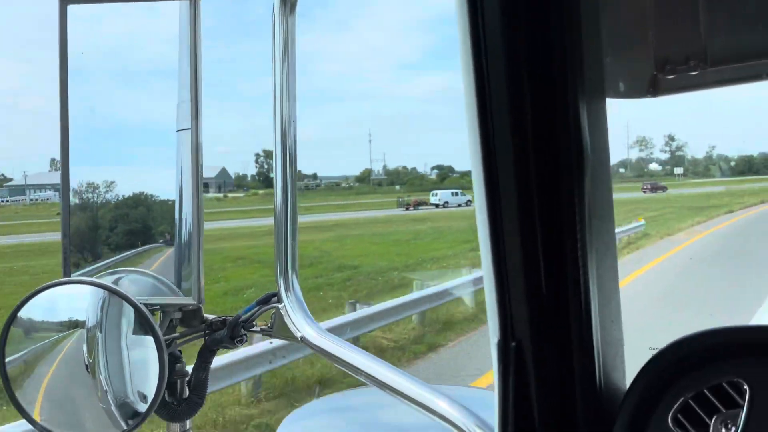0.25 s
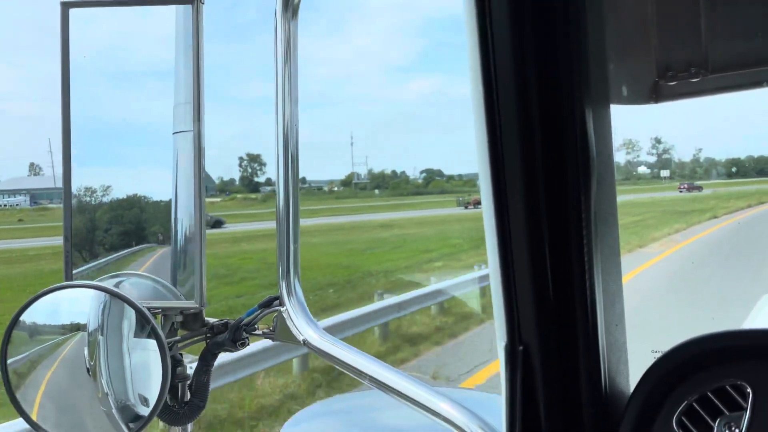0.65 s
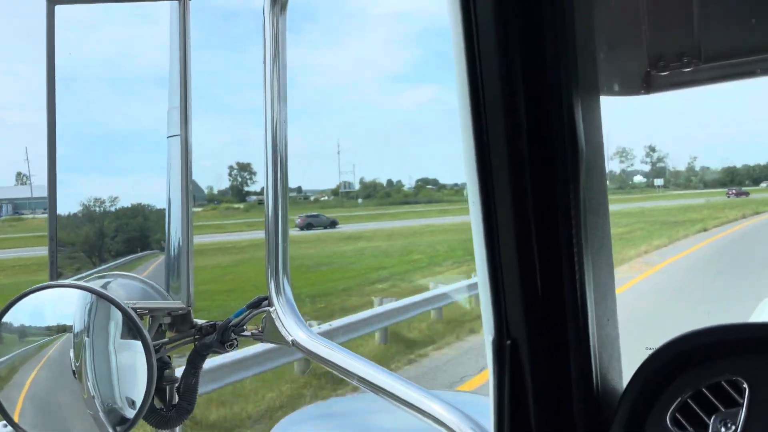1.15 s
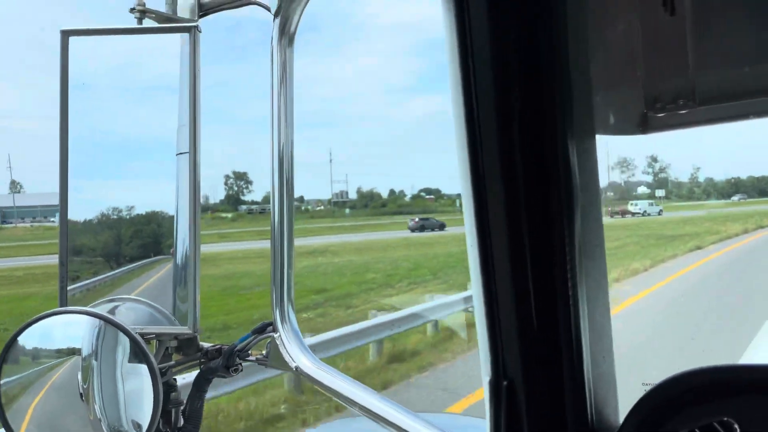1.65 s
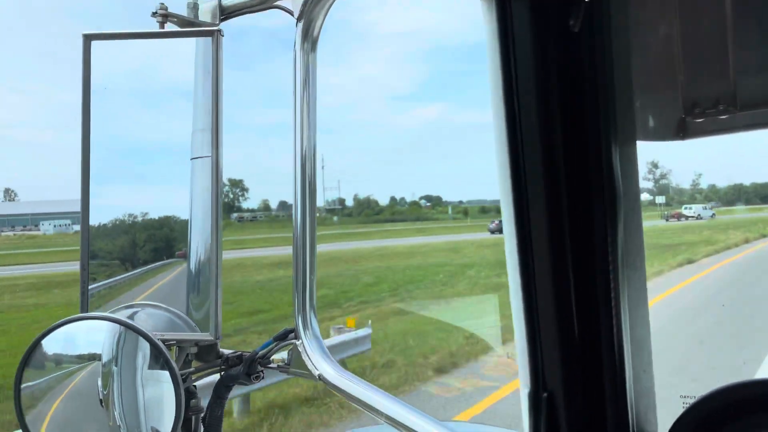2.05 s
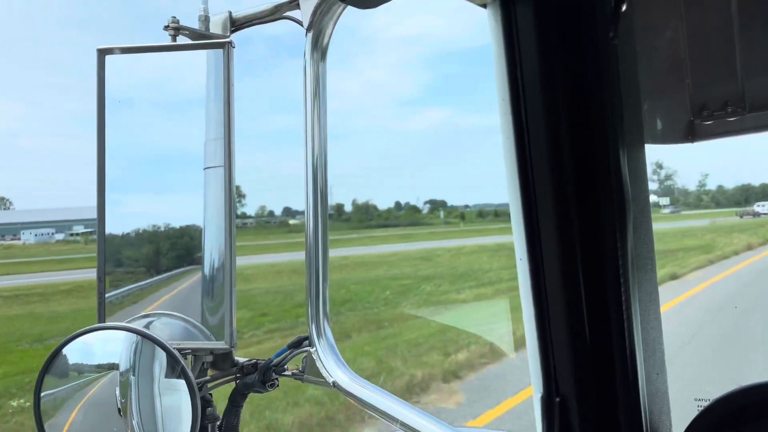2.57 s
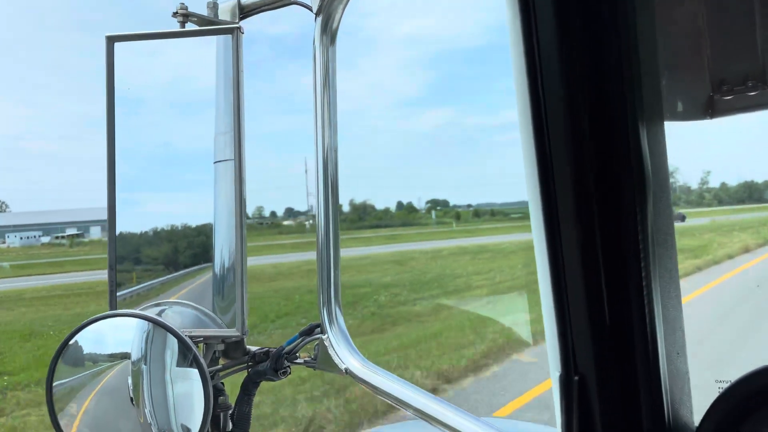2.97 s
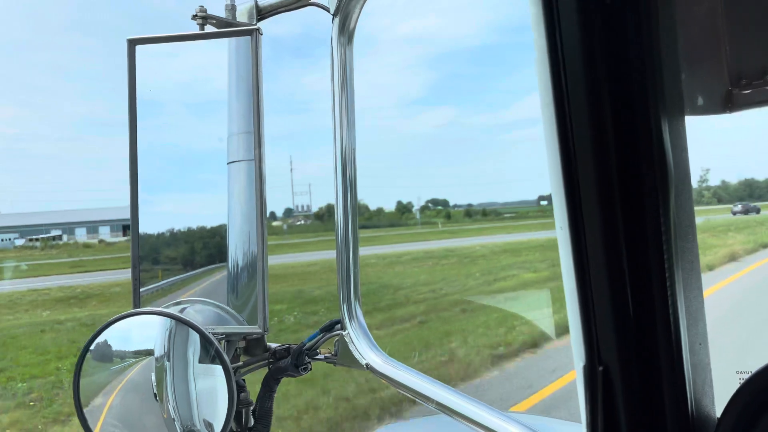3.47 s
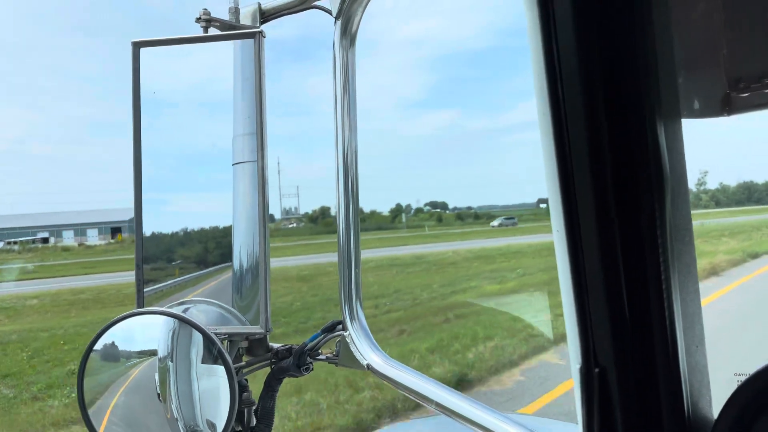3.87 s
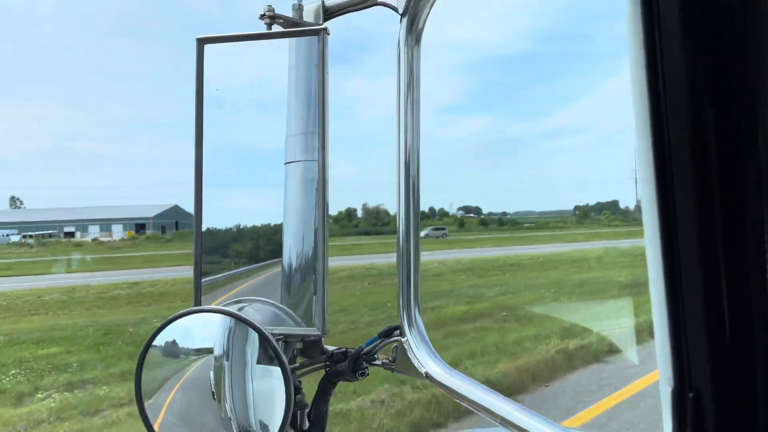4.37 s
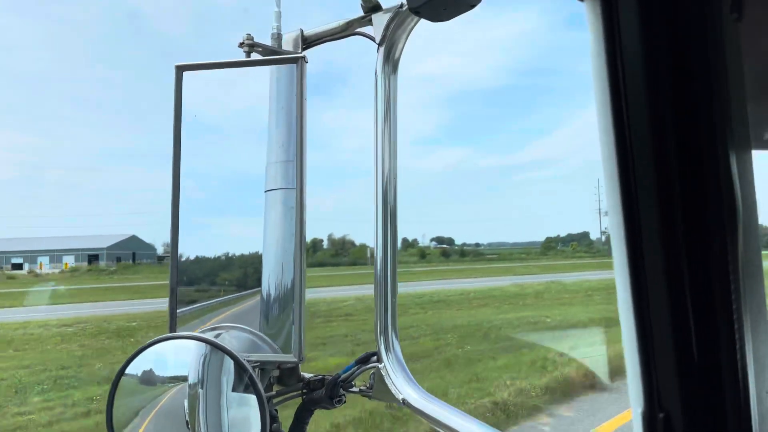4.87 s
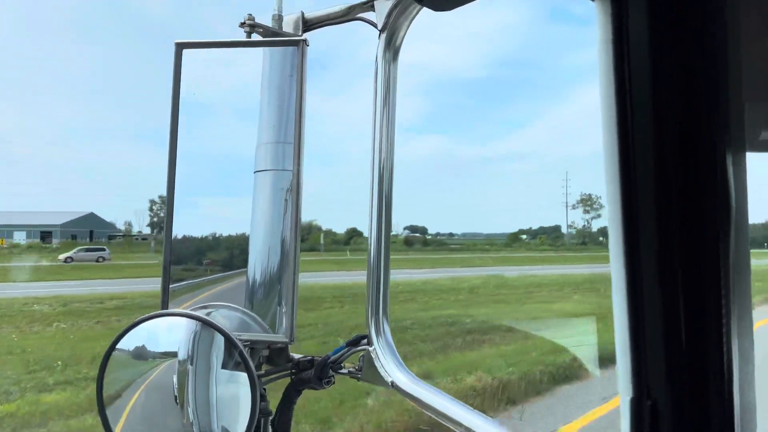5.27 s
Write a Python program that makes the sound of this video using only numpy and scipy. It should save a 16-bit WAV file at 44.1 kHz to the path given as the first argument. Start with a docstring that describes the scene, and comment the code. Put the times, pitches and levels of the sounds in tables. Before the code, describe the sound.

A heavy diesel drones upward and falls, revving briefly twice before a deep labouring pull, with wind thumps, air puffs and faint turbo whistle.

```python
"""A six-cylinder diesel truck pulls hard, lifts off, blips twice through a gear change and lugs away again,
heard in the cab by an open side window. The engine is a harmonic series on the firing rate plus weaker lines
between, lifted by cab booms. Clatter is filtered noise that rings panels and block. Wind on the microphone is
coloured noise with short damped pushes. Hiss, puffs of valve air and a gliding turbo whistle come from outside."""
import sys
import numpy as np
from scipy import signal
from scipy.fft import rfft, irfft, next_fast_len
from scipy.io import wavfile
from scipy.ndimage import uniform_filter1d

SR = 44100
rng = np.random.default_rng(int(sys.argv[2]) if len(sys.argv) > 2 else 0)


def master(y):
    """Save y as 16-bit WAV."""
    cut = np.clip(np.atleast_2d(y).T, -1, 1)
    pcm = np.round(cut * 32767)  # scale
    wavfile.write(sys.argv[1], SR, pcm.astype(np.int16))


N = 243431
TIME_S = np.arange(N) / SR


def undb(db):
    """Logarithmic level: amplitude gain is 10 ** (dB / 20)."""
    return 10 ** (np.asarray(db) / 20)


def curves(table):
    """Linear interpolation: each column of a time table, one value per sample."""
    s, *columns = np.transpose(table)
    return [np.interp(TIME_S, s, column) for column in columns]


def at(x, table):
    """Linear interpolation: look x up in a table of two columns."""
    return np.interp(x, *np.transpose(table))


def follow(load, span_db):
    """Load dependence: level between coasting and full load."""
    return span_db[0] + np.clip(load, 0, 1) * (span_db[1] - span_db[0])


def walk(rate):
    """Slow random modulation: levels held 1 / rate s and slewed twice; spread near 1."""
    k = int(SR / rate)
    steps = np.repeat(rng.standard_normal(N // k + 1), k)
    return 1.3 * uniform_filter1d(uniform_filter1d(steps, k), k)[:N]


def band(x, edge_hz, kind):
    """Band splitting: third-order Butterworth filter."""
    return signal.sosfilt(signal.butter(3, edge_hz, kind, fs=SR, output="sos"), x)


def colour(x, shape):
    """Spectral shaping: filter by (frequency_hz, level_db) points and bring to rms 1."""
    hz, db = np.transpose(shape)
    size = next_fast_len(N)
    grid = np.log(np.maximum(np.arange(size // 2 + 1) * SR / size, 1))
    gain = undb(np.interp(grid, np.log(hz), db, left=-90, right=-90))
    y = irfft(rfft(x, size) * gain, size)[..., :N]
    return y / np.sqrt(np.mean(y ** 2))


def ring(x, modes, even=True):
    """Modal resonance: sum of peaks; even filters each twice and brings it to rms 1 before its gain."""
    out = 0
    for hz, width_hz, db in modes:
        b, a = signal.iirpeak(hz, hz / width_hz, SR)
        part = signal.lfilter(b, a, x)
        if even:
            part = signal.lfilter(b, a, part)
            part = part / part.std()
        out = out + undb(db) * part
    return out


# Likeness of noise at the two ports: frequency_hz, correlation (0-1)
PORT_LIKENESS = [(30, 0.55), (170, 0.79), (260, 0.65), (500, 0.53), (900, 0.35), (1300, 0.48), (2000, 0.91),
                 (2800, 0.41), (4200, 0.091), (5300, 0.6), (6200, 0.81), (7800, 0.83), (8800, 1),
                 (11000, 0.97), (13000, 0.73)]
# Phase by which the left port leads: frequency_hz, lead_rad
LEFT_LEAD = [(200, 0), (300, -1.2), (450, 0), (690, 1.3), (1380, 0), (2330, .2), (3880, .6), (4600, 3),
             (5770, 6.1), (6720, 7), (8300, 9.42), (9600, 9.42), (10200, 10), (11800, 12.4), (13700, 12.5)]


def ports(envelope):
    """Partial coherence: noise under one envelope, part shared by the left and right port."""
    size = next_fast_len(N)
    hz = np.maximum(np.arange(size // 2 + 1) * SR / size, 1)
    left, other = rfft(envelope * rng.standard_normal((2, N)), size)
    alike_hz, correlation = np.transpose(PORT_LIKENESS)
    alike = np.clip(np.interp(np.log(hz), np.log(alike_hz), correlation), 0, 1)
    late = np.exp(-1j * at(hz, LEFT_LEAD))
    right = alike * late * left + np.sqrt(1 - alike ** 2) * other
    return irfft(np.array([left, right]), size)[:, :N]


# Spectrum of the flutter, also of the rough edge on each push: frequency_hz, level_db (per Hz)
FLUTTER_SHAPE = [(120, -14), (200, -3), (509, -7), (563, -10.5), (626, -15), (707, -14), (1100, -26.5),
                 (1430, -52.5), (2420, -120)]
THUMP_OVERTONE_DB, THUMP_NOISE_DB = -19.5, -12.5  # overtone and rough edge against the main tone


def thuds(table, t60_s, skew_rad):
    """Damped oscillation: a brief push for each row, its main tone out of step by skew_rad at the ports."""
    out, t = np.zeros((2, N + SR)), np.arange(SR // 20) / SR
    edge = colour(rng.standard_normal((2, N)), FLUTTER_SHAPE)[:, :len(t)]
    envelope = (1 - np.exp(-t / 0.0038)) ** 2 * np.exp(-np.log(1000) * t / t60_s)
    for (s, db, hz), (pan, skew) in zip(table, rng.standard_normal((len(table), 2))):
        start = int(s * SR)
        turn = 2 * np.pi * hz * t + skew_rad * np.sign(skew) * np.array([[.5], [-.5]])
        tone = np.sin(turn) + undb(THUMP_OVERTONE_DB) * np.sin(2.415 * turn)
        push = (tone + undb(THUMP_NOISE_DB) * np.roll(edge, start)) * envelope
        port_db = db + 1.7 * pan * np.array([[1], [-1]])
        out[:, start:][:, :len(t)] += undb(port_db) * push / np.abs(push).max()
    return out[:, :N]


# Small eddies between the loud ones: time_s, mean_peak_db
SWARM_LEVEL = [(0, -33), (.5, -38), (1, -34), (1.8, -30), (2.1, -27), (2.7, -26.5), (3.2, -23.5),
               (3.7, -22), (3.9, -32), (4.2, -14), (4.35, -17.5), (4.7, -14), (5, -16), (5.3, -18.5),
               (5.52, -17)]
SWARM_PER_S, SWARM_SPREAD_DB = 110, 3
SWARM_HZ, SWARM_OCTAVES = 219.6, 0.697  # median pitch and its spread


def swarm():
    """Turbulence as random arrivals: rows of start_s, peak_db, pitch_hz."""
    count = int(SWARM_PER_S * N / SR)
    s = rng.random(count) * (N - 1) / SR
    size, pitch = rng.standard_normal((2, count))
    db = at(s, SWARM_LEVEL) + SWARM_SPREAD_DB * np.clip(size, -2, 2)
    return np.transpose([s, db, SWARM_HZ * 2 ** (SWARM_OCTAVES * np.clip(pitch, -2, 2))])


# Spectrum of the wind rumble: frequency_hz, level_db (per Hz)
RUMBLE_SHAPE = [(12, -36), (25, -18.5), (43, 0), (61, 0.5), (80, -4), (114, 3), (155, -1), (260, -14),
                (340, -27)]
# Brief drops of the wind: centre_s, half_length_s, change_db
WIND_LULLS = [(0.396, 0.04, -6), (1.273, 0.011, -5), (2.563, 0.029, -6), (2.748, 0.039, -7.5),
              (3.27, 0.02, -3), (4.182, 0.012, -2.5)]
# Gusts that thump the microphone: start_s, peak_db (before a random pan), pitch_hz
GUST_THUMPS = [(1.39, -10, 261), (1.56, -11.5, 250), (1.779, -12, 250), (1.938, -3, 198),
               (2.077, -5.5, 300), (2.204, -10, 365.2), (2.398, -6.5, 257.2), (2.473, -16, 406),
               (2.904, -12, 321.6), (3.132, -26, 550), (3.299, -10.5, 206), (3.638, -10, 215.5),
               (3.867, -2, 233.5), (3.91, -14.5, 255.8), (3.948, -23, 587), (4.359, -14.5, 355),
               (4.534, -13, 316.4), (4.621, -18, 451.4), (4.664, -17.5, 605), (4.749, -29, 410),
               (4.945, -30, 453), (5.017, -22, 500.3), (5.312, -17, 546.5)]
# Eddies that push one port and pull the other: start_s, peak_db (before a random pan), pitch_hz
CROSS_EDDIES = [(1.160, -15, 330), (1.646, -16, 247), (2.094, -7, 350), (2.156, -19, 330),
                (2.235, -16, 220), (2.443, -22, 302), (2.550, -15, 318), (2.631, -16, 250),
                (2.750, -22, 300), (2.859, -14, 250), (2.968, -16, 350.5), (3.072, -20, 280),
                (3.138, -13, 250), (3.279, -10, 248.2), (3.343, -17, 379.9), (3.413, -17, 181.2),
                (3.479, -17, 260), (3.566, -19, 330), (3.647, -19, 219.9), (3.681, -12, 260),
                (3.972, -25, 414), (4.082, -15, 261.7), (4.140, -12, 300), (4.294, -12, 302),
                (4.345, -14, 198), (4.401, -15, 500), (4.490, -9, 292), (4.570, -8, 303.2),
                (4.622, -10, 413), (4.686, -12, 400.2), (4.773, -16, 296.9), (4.822, -16, 481),
                (4.867, -15, 398), (4.915, -14, 296), (4.943, -8.5, 304), (5.012, -12, 149.2),
                (5.057, -13, 510), (5.167, -11, 300.4), (5.244, -13, 300), (5.356, -11, 420),
                (5.405, -7, 178.5), (5.43, -14, 395), (5.494, -17, 301)]
THUMP_T60_S, EDDY_T60_S = 0.028, 0.024
THUMP_SKEW_RAD, EDDY_SKEW_RAD, SWARM_SKEW_RAD = 0.43, 2.93, 2.93  # phase between the ports


def wind(rumble_db, flutter_db):
    """Turbulent pressure: lumpy rumble, with faster, shallower flutter above it, thumps and cross eddies."""
    rumble = colour(ports(undb(3.1 * walk(22.164))), RUMBLE_SHAPE)
    rumble = rumble / band(rumble, (110, 135), "band").std()  # rumble_db is the level in this band
    flutter = colour(ports(undb(2.0 * walk(45))), FLUTTER_SHAPE)
    lull_db = sum(db * np.exp(-((TIME_S - s) / half_s) ** 2) for s, half_s, db in WIND_LULLS)
    pushes = thuds(GUST_THUMPS, THUMP_T60_S, THUMP_SKEW_RAD)
    pushes = pushes + thuds(CROSS_EDDIES, EDDY_T60_S, EDDY_SKEW_RAD)
    pushes = pushes + thuds(swarm(), EDDY_T60_S, SWARM_SKEW_RAD)
    return undb(lull_db) * (undb(rumble_db) * rumble + undb(flutter_db) * flutter) + pushes


# Airy swells in the low treble: start_s, end_s, level_db
SWELL_TIMES = [(1.4, 1.744, -37), (2.315, 2.726, -37)]
# Resonances of the swells: frequency_hz, width_hz (of each pass), level_db
SWELL_MODES = [(1210, 210, -1.5), (2350, 1190, 1.5), (2920, 1000, -24)]


def swells():
    """Amplitude-modulated band noise: rushes of air that rise, hold and fade."""
    shape = 0
    for start, end, db in SWELL_TIMES:
        phase = np.clip((TIME_S - start) / (end - start), 0, 1)
        shape = shape + undb(db) * np.sin(np.pi * phase) ** 0.59
    return shape * ring(ports(undb(1.5 * walk(30))), SWELL_MODES)


# Spectrum of the steady hiss: frequency_hz, level_db (per Hz)
HISS_SHAPE = [(3000, -2), (3900, 6.5), (5500, -2), (7000, -2), (8500, -3.5), (9500, -12), (10200, -2),
              (11200, -0.5), (12200, -14.5), (12500, -35)]


def hiss(level_db):
    """Broadband flow noise: a steady hiss of air outside."""
    return undb(level_db) * colour(ports(undb(0.51 * walk(9.0))), HISS_SHAPE)


# Spectrum of the puffs: frequency_hz, level_db (per Hz)
PUFF_SHAPE = [(1200, -4), (2000, -2), (2700, 3), (3800, -2), (5200, -7), (7500, 1), (8400, -2),
              (9500, -5.5), (10800, 1.5), (12300, -13.5), (13000, -21), (14800, -48)]
# Whistling of the valve: frequency_hz, width_hz (of each pass), level_db
NOZZLE_MODES = [(2700, 2400, -15.5), (5460, 2000, -39), (10600, 90, -21)]
# Valve housing, rung as each puff opens: frequency_hz, width_hz, gain_db
HOUSING_MODES = [(2120, 70, 10), (2525, 50, 19), (3235, 50, 13), (3924, 60, 12), (4597, 50, 8),
                 (5351, 60, 8)]
# Puffs of air from a valve: start_s, level_db, rise_s, t60_s, share_5500_to_9000_hz_db,
# share_above_9000_hz_db, whistle_hz, whistle_db (before a common -8 dB)
PUFF_EVENTS = [(.004, -24.5, 0.0023, 0.17, 10, 12, 4350, 7), (0.331, -12, 0.0025, 0.13, -2, 11, 2540, -9),
               (0.43, -37.5, 0.0035, 0.19, 4.5, 2, 3800, 3), (0.685, -29, 0.0021, 0.15, 4.5, -3, 3840, -6),
               (0.832, -35, 0.0079, 0.77, 1.5, -3, 2234, 1),
               (1.013, -28.5, .003, 0.057, -22, -22, 4600, -14),
               (1.213, -31.5, 0.0048, 0.13, -14, -4, 3200, -16),
               (1.371, -41.5, .003, 0.11, -2, 11, 11500, 4), (1.47, -29.5, 0.0049, 0.56, 6, 3.5, 2650, -3),
               (2.269, -34.5, 0.0029, 0.13, 8.5, 5, 4570, 5), (2.308, -40, 0.0025, 0.17, 8, 6, 7300, -1),
               (2.48, -44, 0.0027, 0.38, 4.5, 2.5, 7500, -10), (2.59, -47, 0.0027, 0.15, 4, 10, 7400, 0),
               (3.356, -28.5, 0.0093, 0.14, 2.5, -3, 7000, -15),
               (3.716, -41.5, 0.0018, 0.087, 0, 9.5, 11400, 1),
               (3.809, -36, .003, 0.12, -11, -14, 2025, -1), (4.519, -28.5, 0.004, 0.23, -16, -9, 3900, 2)]
WHISTLE_Q, KNOCK_T60_S = 6, .04


def puffs():
    """Jet noise with exponential decay: each puff hisses and whistles, and its opening rings the housing."""
    jet = ports(undb(2.2 * walk(120)))
    gas = colour(jet, PUFF_SHAPE) + ring(jet, NOZZLE_MODES)
    body, middle, top = band(gas, 5500, "low"), band(gas, (5500, 9000), "band"), band(gas, 9000, "high")
    out, knocks = 0, 0
    for s, db, rise_s, t60_s, middle_db, top_db, hz, whistle_db in PUFF_EVENTS:
        age = np.maximum(TIME_S - s, 0)
        opening = undb(db) * (1 - np.exp(-age / rise_s))
        knocks = knocks + opening * np.exp(-np.log(1000) * age / KNOCK_T60_S)
        whistle = undb(-8.0) * ring(jet, [(hz, hz / WHISTLE_Q, whistle_db)])
        air = body + undb(middle_db) * middle + undb(top_db) * top + whistle
        out = out + opening * np.exp(-np.log(1000) * age / t60_s) * air
    return out + ring(knocks * jet, HOUSING_MODES, even=False)


# Turbo, spooling up under load and running down after the lift: time_s, pitch_hz
TURBO_PITCH = [(0, 4950), (.5, 5350), (.7, 5500), (.82, 5250), (.93, 4960), (1.05, 4760), (1.2, 4510),
               (1.35, 4220), (1.72, 3770), (2, 3650), (3.2, 3500), (3.6, 3200), (5.52, 3400)]
# Mean level of the turbo whistle by its pitch: pitch_hz, level_db
TURBO_LEVEL_BY_PITCH = [(3250, -72), (3550, -64), (3750, -58), (4000, -64), (4400, -63), (4800, -61),
                        (4950, -59), (5050, -65), (5250, -62), (5480, -64)]
WINDOW_LAG_S = 0.0002  # the whistle comes in by the window and reaches the left port first


def turbo():
    """Phase integration: a wavering gliding tone, its level set by its pitch."""
    hz, = curves(TURBO_PITCH)
    level_db = at(hz, TURBO_LEVEL_BY_PITCH) + 3.0 * walk(40)
    turns = np.cumsum(hz * (1 + 0.006 * walk(150))) / SR
    turns = turns - hz * WINDOW_LAG_S * np.array([[0], [1]])
    return np.sqrt(2) * undb(level_db) * np.sin(2 * np.pi * turns)


# Spectrum of the clatter: frequency_hz, level_db (per Hz)
CLATTER_SHAPE = [(470, -41), (800, 0), (1030, -7.5), (1180, -9.5), (1540, -13.5), (1830, -14),
                 (2150, -11.5), (2340, -15.5), (2590, -16), (3080, -18.5), (5000, -44.5), (6500, -46),
                 (11000, -120)]
# Panels rung by the clatter: frequency_hz, width_hz (of each pass), level_db
PANEL_MODES = [(338.8, 53, -3.5), (626, 55, -4), (796, 22, -17), (1160, 190, -19), (2580, 1200, -21.5),
               (3390, 83, -25)]
# Block rung by hard combustion: frequency_hz, width_hz (of each pass), level_db
BLOCK_MODES = [(1380, 200, -23), (2150, 400, -24), (3900, 500, -30), (4450, 600, -27), (6000, 600, -31)]


def clatter(turns, level_db, load_db):
    """Impact-driven resonance: valve gear rattles bulkhead and panels; under load the firings ring the block."""
    beat = 6.0 + np.exp(-(turns % 1) / 1.1)  # a small lift at each firing
    rattle = ports(beat * undb(1.6 * walk(18) + 0.56 * walk(60)))
    rattling = colour(rattle, CLATTER_SHAPE) + ring(rattle, PANEL_MODES)
    return undb(level_db) * rattling + undb(load_db) * ring(ports(beat), BLOCK_MODES)


# Higher lines: multiple of the firing rate
UPPER_MULTIPLES = (3, 4, 5, 6, 7, 8, 10)
# Their levels, on top of the load and the exhaust path: level_db
UPPER_LEVELS = (-1, -8, -16, -15, -18.5, -26, -20)
# Lines between, from cylinders that differ: multiple of the full cycle of six firings
BETWEEN_MULTIPLES = (3, 5, 7, 9, 10, 14, 20, 21, 27, 29, 33, 39)
# Their levels, on top of the unevenness: level_db
BETWEEN_LEVELS = (-7.5, -3.5, 1, -1, 0.5, -10, -13.5, -16, -15.5, -16, -19.5, -26.5)
# Level of the second multiple on top of the load: time_s, change_db
SECOND_LEVEL_SWING = [(0, 4.5), (.9, 2.5), (1.05, 1.5), (1.22, 5), (1.35, -2.5), (1.9, 3.5), (2.12, 3),
                      (2.3, -3), (2.47, 7), (2.6, -1), (2.72, 7.5), (2.8, -4.5), (2.97, 3.5), (3.15, 5),
                      (3.6, 1.5), (3.9, -5.5), (4.3, -2.5), (5.52, -0.5)]
# Way from the exhaust into the cab: frequency_hz, gain_db
EXHAUST_PATH = [(45, 6), (53, 4), (66, -1), (74, 0), (88, -8.5), (92, -20.5), (94, -3), (98, 2), (103, 5.5),
                (105.3, -6), (107.2, 7.5), (113, 1), (122, 1.5), (146, 6.5), (156, 0), (163, 7.5),
                (187, -10), (193, -2.5), (202, -5), (214, -4.5), (225, -8.5), (250, -5), (270, 5),
                (290, -6), (322, 6), (345, 5), (375, 0.5), (415, -1), (470, -1)]
# Cab booms added to the engine lines: frequency_hz, width_hz, gain_db
CAB_BOOM_MODES = [(97.17, 1.15, 8.5), (150.7, 10.4, -3), (513, 16, 4.5)]
BOOM_DB, SECOND_DB, UPPERS_DB = (-30, -12.5), (-29, -18.5), (-42, -21)  # (coasting, full load)
GEAR_TEETH = 74 / 6  # mesh whine as a multiple of the firing rate
GEAR_DB, GEAR_OUT_S, GEAR_FADE_DB_PER_S = -48, .76, 200  # whines only until the low gear is let go
UPPER_WAVER_DB = 1.5  # extra waver above the third multiple


def engine(hz, load, uneven_db):
    """Harmonic series: wavering multiples of the firing rate and lines between, lifted by cab booms."""
    turns = np.cumsum(hz * (1 + 0.0017 * walk(14))) / SR
    upper_db = follow(load, UPPERS_DB)
    second_db = follow(load, SECOND_DB) + curves(SECOND_LEVEL_SWING)[0]
    gear_db = GEAR_DB - GEAR_FADE_DB_PER_S * np.maximum(TIME_S - GEAR_OUT_S, 0)
    lines = [(1, follow(load, BOOM_DB)), (2, second_db)]
    lines += [(k, upper_db + db) for k, db in zip(UPPER_MULTIPLES, UPPER_LEVELS)]
    lines = [(k, db + at(k * hz, EXHAUST_PATH)) for k, db in lines]
    lines += [(k / 6, uneven_db + db) for k, db in zip(BETWEEN_MULTIPLES, BETWEEN_LEVELS)]
    lines += [(GEAR_TEETH, gear_db)]
    out = 0
    for k, db in lines:
        # paths through the cab differ at the two ports, more so for short waves
        skew = 0.019 * k * rng.standard_normal((2, 1))
        waver_db = 2.5 - 2.1 * np.clip(load, 0, 1) + UPPER_WAVER_DB * (k > 3)  # steadier under load
        tone = np.sin(2 * np.pi * (k * turns + rng.random() + skew))
        out = out + np.sqrt(2) * undb(db + waver_db * walk(9)) * tone
    return out + ring(out, CAB_BOOM_MODES, even=False), turns, upper_db


# Wind: time_s, rumble_db (between 110 and 135 Hz, before lulls), gust_db (on flutter, clatter and hiss)
WIND_COURSE = [(0, -26, 2), (.3, -22.5, 1), (.47, -24, -2), (.83, -28.5, -1.5), (1, -20, 0.5),
               (1.44, -22.5, 0.5), (1.6, -19, 6), (1.78, -23.5, 1), (2.1, -15.5, 1.5), (2.41, -27, 1.3),
               (2.52, -25.5, 5), (2.7, -17, 1.9), (3, -21, -2), (3.32, -19, 1.3), (3.6, -22, 1.1),
               (4.1, -23, 0), (4.6, -18.5, -0.8), (4.88, -23, 1.4), (5, -26, 1), (5.52, -27, 1)]
# Level of the flutter alone: time_s, change_db
FLUTTER_LEVEL_SWING = [(0, -1), (.8, -3.5), (1.4, 2), (2.2, 0), (2.9, 4), (3.8, 2), (4.3, -4), (4.9, -1),
                       (5.52, 2)]
# Engine: time_s, mean firing_rate_hz, load (0-1), cylinder_unevenness_db
ENGINE_COURSE = [(0, 92.94, 0.67, -19), (.25, 94.45, 0.73, -19), (.45, 95.42, 0.75, -25),
                 (.8, 98.23, 0.66, -24), (.9, 90.9, 0.58, -44), (1.2, 79.98, 0.2, -24),
                 (1.6, 68.63, 0, -25), (1.92, 59.2, 0.26, -29), (2.02, 65.67, 1, -29),
                 (2.14, 74.23, 0.65, -29), (2.3, 72.63, 0.44, -22), (2.45, 70, 0, -23.5),
                 (2.78, 61.78, 0.32, -38.5), (2.88, 67.67, 1, -22.5), (2.97, 74.9, 0.73, -25.5),
                 (3.1, 70.8, 0.01, -23), (3.3, 67.52, 0.11, -35.5), (4.19, 50.78, 0.16, -35),
                 (4.25, 51.48, 0.72, -42), (4.7, 52.7, 0.88, -38), (5, 53.44, 0.99, -32),
                 (5.33, 54.37, 0.98, -24.5), (5.52, 55.6, 1, -32)]
FLUTTER_DB, CLATTER_DB, HISS_DB = (-31.5, -23.5), (-39, -32.5), (-53, -42.5)  # (coasting, full load)
# clatter and flutter grow with the firing rate: the levels above hold at MID_HZ
MID_HZ, CLATTER_DB_PER_HZ, FLUTTER_DB_PER_HZ = 70, 0.0621, 0.189
BOOST_LAG_S = 0.077  # hiss and clatter trail the load


def scene():
    """Superposition: everything that reaches the two ports, with load and gusts setting the levels."""
    hz, load, uneven_db = curves(ENGINE_COURSE)
    rumble_db, gust_db = curves(WIND_COURSE)
    keep = np.exp(-1 / (BOOST_LAG_S * SR))
    boost = load[0] + signal.lfilter([1 - keep], [1, -keep], load - load[0])
    flutter_db = follow(load, FLUTTER_DB) + FLUTTER_DB_PER_HZ * (hz - MID_HZ) + gust_db
    flutter_db = flutter_db + curves(FLUTTER_LEVEL_SWING)[0]
    clatter_db = follow(boost, CLATTER_DB) + CLATTER_DB_PER_HZ * (hz - MID_HZ) + gust_db
    air = wind(rumble_db, flutter_db) + swells()
    outside = hiss(follow(boost, HISS_DB) + gust_db) + puffs() + turbo()
    motor, turns, load_db = engine(hz, load, uneven_db)
    return air + outside + clatter(turns, clatter_db, load_db) + motor


TOP_HZ = 15100


def record(dry):
    """Saturation and band limiting: the loudest peaks are rounded and the top is cut."""
    soft = dry / (1 + (dry / .96) ** 4) ** .25
    return signal.sosfilt(signal.ellip(8, .2, 80, TOP_HZ, fs=SR, output="sos"), soft)


dry = scene()
out = record(dry)
master(out)
```